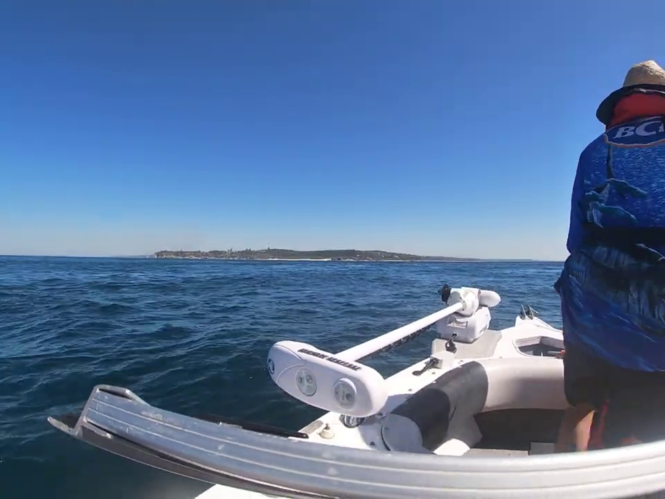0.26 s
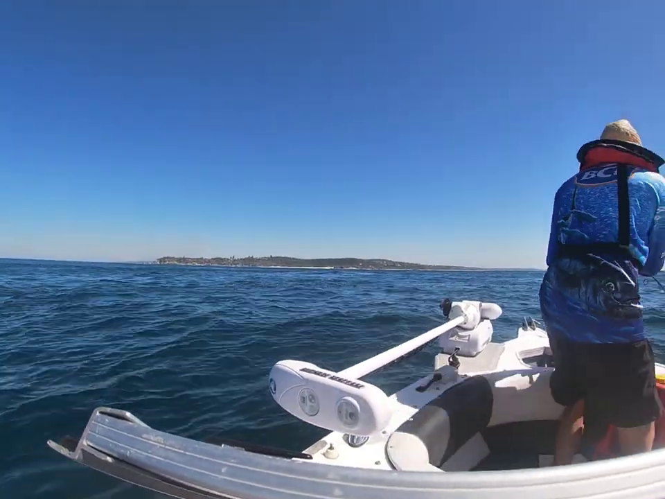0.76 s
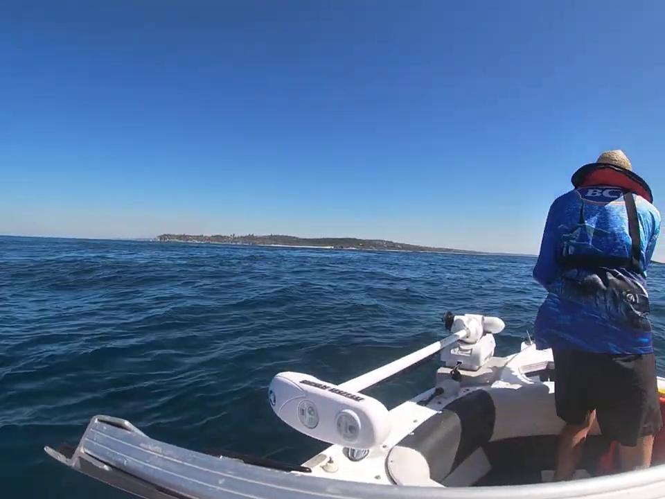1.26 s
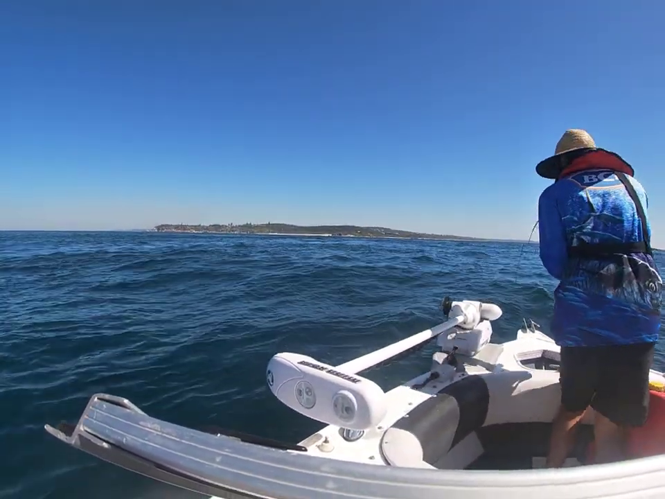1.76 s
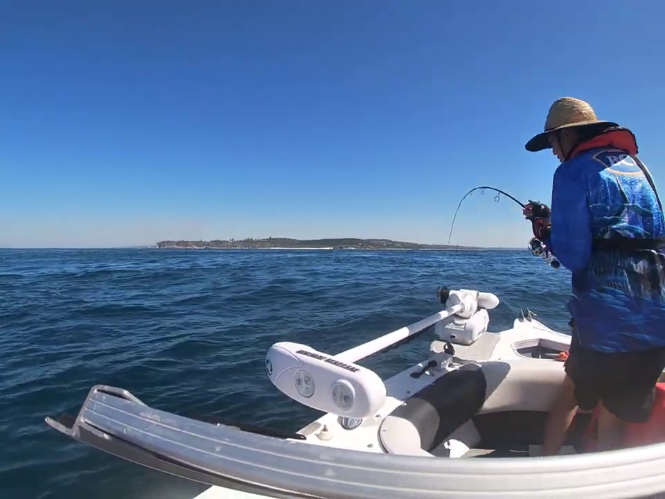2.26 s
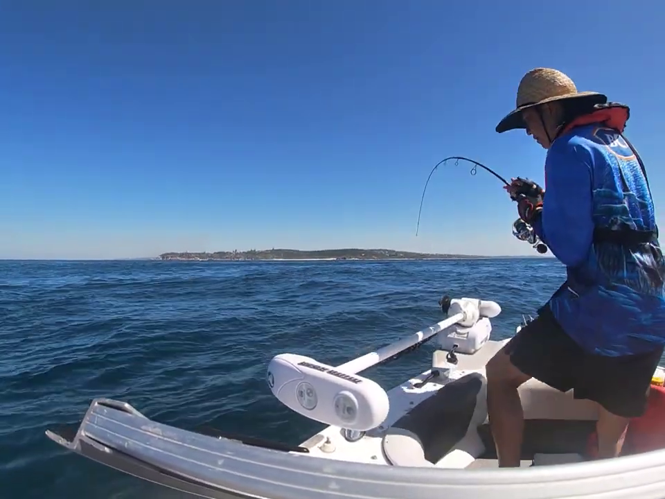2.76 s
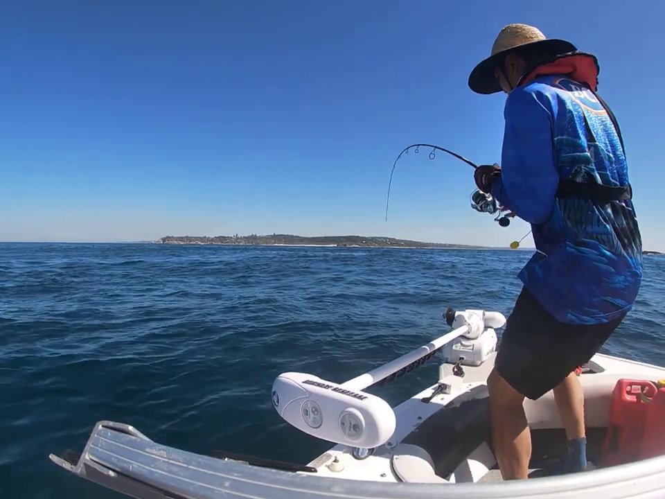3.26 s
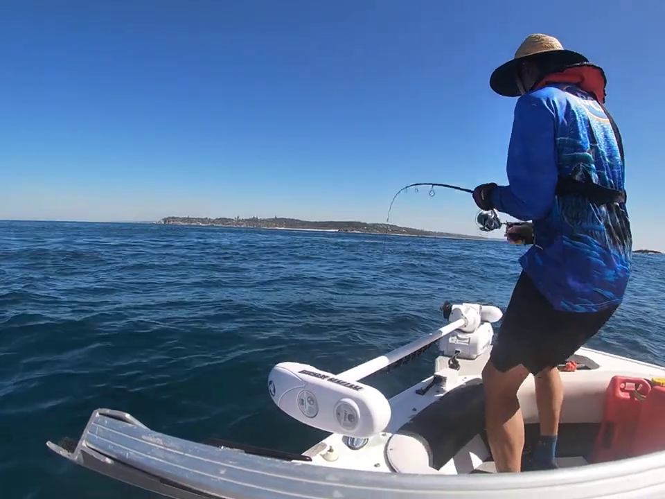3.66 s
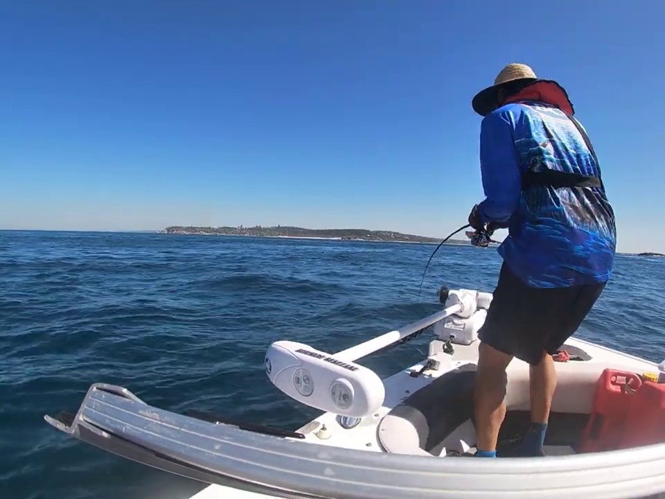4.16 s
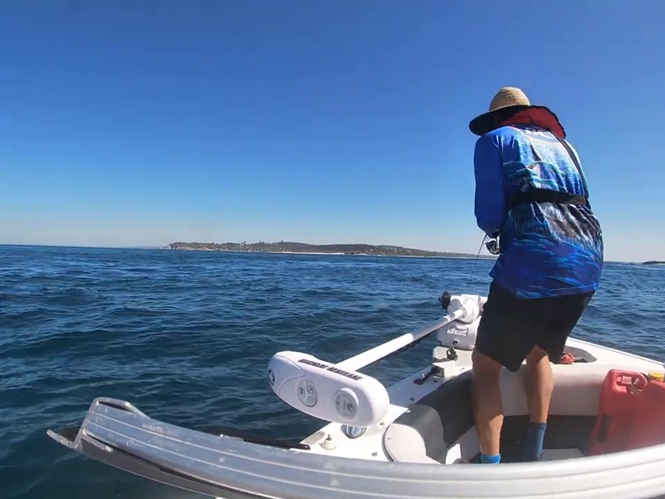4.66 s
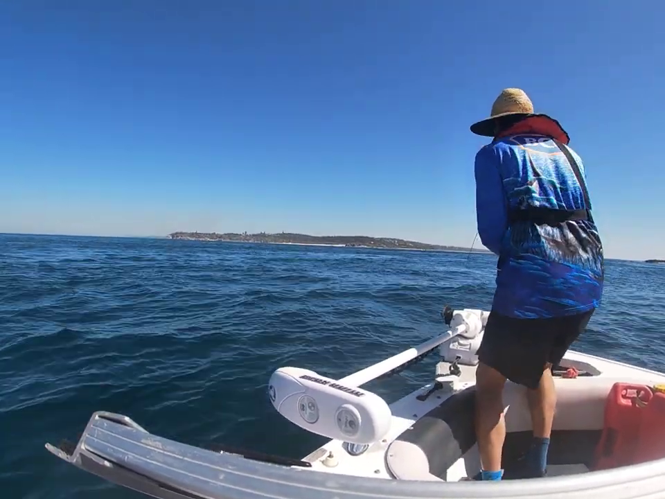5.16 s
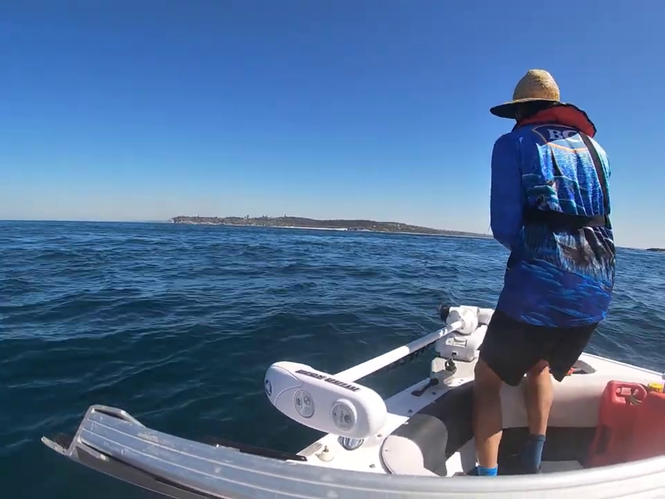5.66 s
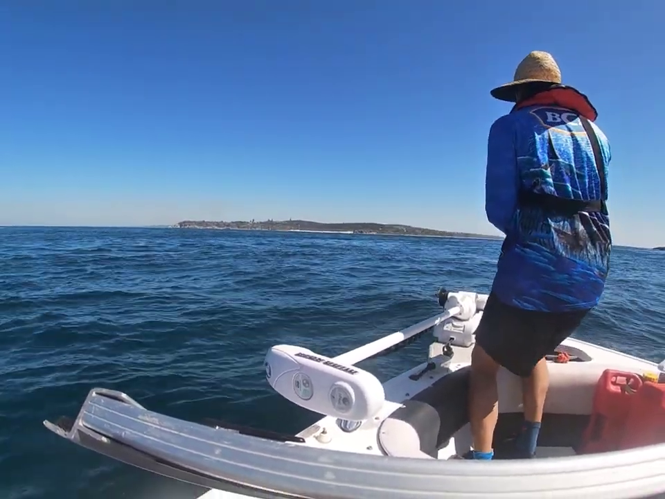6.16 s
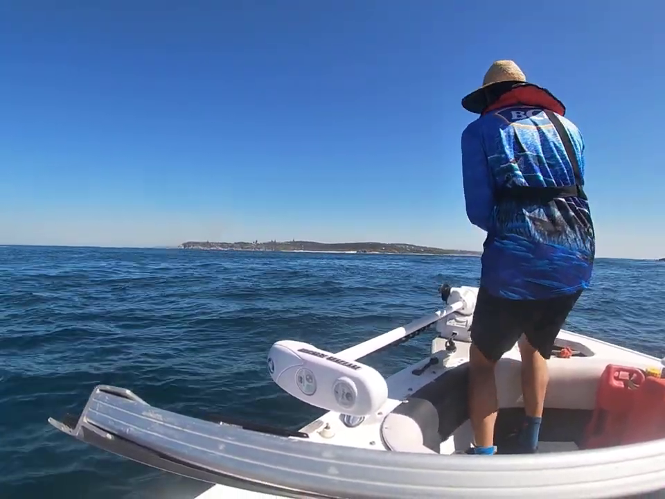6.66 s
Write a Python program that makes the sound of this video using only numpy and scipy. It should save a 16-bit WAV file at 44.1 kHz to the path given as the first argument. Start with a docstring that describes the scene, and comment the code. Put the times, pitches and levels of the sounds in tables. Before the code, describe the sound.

The microphone sits on a small boat in open air. From 0 to 0.6 s, hard low hull thumps come with hollow slaps, bubbly spray and a small click. It eases until 1.8 s, with quieter plops, gurgling and wind rumble. Between 1.8 and 3.9 s the hull booms more often, waves smack the side at about 2.3, 2.9 and 3.45 s, and tackle clicks with brief metal rings, notably near 3.1 s. At 4.0 s a few ticks start the reel; the drag quickly becomes a bright metallic buzz, peaking near 4.25 s, slowing around 4.6, then surging fast from 5.1 to 5.65 s, duller in treble. It falters, breaks into single ticks around 6.0 s, and buzzes again, slower, from 6.15 to 6.5 s. Slaps and wash continue beneath; gusts thud on the microphone, densest after 5 s, over faint steady hiss.

```python
"""A small boat rocks on a light sea: its hull thumps and low rings boom (sliding sines) as waves slap the side.
Slaps, spray and the wash along the hull are shaped noise mixed with showers of ringing bubbles.
From four seconds on a hooked fish pulls line in surges and the drag of the fishing reel buzzes:
a train of pin ticks rings the reel's resonances. Tackle clicks, wind buffets the microphone
with lumpy low noise, and a faint, steady hiss with a sharp upper edge lies behind."""
import sys
import numpy as np
from scipy import signal
from scipy.io import wavfile
from scipy.ndimage import map_coordinates

SR = 44100
rng = np.random.default_rng(int(sys.argv[2]) if len(sys.argv) > 2 else 0)


def wav_record(signal):
    """Record a signal, one row per channel, as 16-bit PCM in the file named by sys.argv[1]."""
    frames = np.transpose(np.atleast_2d(signal))
    bounded = np.clip(frames, -1, 1)
    # unit amplitude maps onto the largest positive 16-bit level
    quanta = np.round(bounded * 32767).astype(np.int16)
    wavfile.write(sys.argv[1], SR, quanta)


N = 304731
TIME = np.arange(N) / SR
CREEP_PER_S = 52   # at or below this click rate the drag's steady run stops


def knocks():
    """Falling thumps of the hull, low booming rings from water and wind, and small plops beside the boat."""
    # the hull drops onto a wave: (t/s, relative peak/dB, pitch/Hz, t60/s)
    hull_thumps = [(0.253, -9, 84, 0.23), (0.518, -12, 117, 0.097), (1.892, -19.5, 85.6, 0.61),
                   (2.142, -19.5, 51, 0.11), (2.897, -10.5, 70, 0.045), (3.33, -19.5, 67.4, 0.15),
                   (3.552, -9, 115.4, 0.017), (4.235, -18.5, 112.8, 0.51), (4.779, -22.5, 67.16, 0.19),
                   (5.232, -13, 106, 0.053), (6.074, -23, 68.1, 0.11)]
    # low booming rings, some from water under the hull, later ones from wind buffets:
    # (t/s, relative peak/dB, pitch/Hz, t60/s, glide/octaves per s)
    low_rings = [(.141, -25, 310, 0.069, 4.5), (.167, -27, 308, 0.035, -7), (.187, -35, 315, 0.26, -5.5),
                 (.94, -33.5, 217, 0.26, -1), (.978, -32, 263, 0.14, 4.5), (1.04, -44, 307, 0.08, 0),
                 (1.773, -23.5, 175, 0.062, -6.5), (1.815, -31, 171, 0.074, 0),
                 (1.845, -17, 174, 0.052, 0.5), (2.381, -25.5, 144.6, 0.12, 6.5),
                 (2.421, -22.5, 159.8, 0.32, 0.5), (2.512, -27.5, 155, 0.43, 0),
                 (2.686, -21.5, 154.8, 0.32, 0.5), (2.872, -13.5, 139.7, 0.13, 6),
                 (2.913, -20.5, 213, 0.16, -1.5), (3.046, -22, 204, 0.14, 4.5), (3.07, -20, 200, 0.095, -1),
                 (3.12, -36, 432, 0.27, -1.5), (3.433, -23.5, 146, 0.35, 2.5), (3.437, -17, 311, 0.031, -4),
                 (3.462, -23.5, 230.7, .2, -0.5), (3.545, -21.5, 154.4, 0.14, 0),
                 (4.056, -26, 192.5, 0.23, 0.5), (4.224, -13.5, 161.4, 0.23, 5), (4.245, -31, 290, 0.1, 4),
                 (4.302, -20, 169, .09, 1), (4.389, -28.5, 169, .08, 0), (4.463, -24.5, 159.1, 0.044, 14),
                 (4.58, -30, 165, 0.24, 1.5), (5.074, -28.5, 150, 0.087, -2), (5.18, -19.5, 181, 0.05, -1),
                 (5.188, -26.5, 307.7, 0.079, 1.5), (5.388, -27.5, 177, 0.085, -5.5),
                 (5.627, -31, 409.7, 0.12, -9.5), (5.648, -26.5, 371, 0.13, 0.5),
                 (5.755, -32, 193.2, 0.45, 0.5), (5.838, -21, 162, 0.07, -2.5),
                 (5.976, -28.5, 170, .08, -2.5), (6.186, -28.5, 147, 0.046, 11),
                 (6.228, -28, 270.4, 0.047, -1), (6.413, -29.5, 291.5, 0.09, -2.5),
                 (6.602, -29.5, 171.7, 0.33, 0), (6.643, -32, 297, 0.12, 0)]
    # single bubbles pinched off beside the boat:
    # (t/s, relative peak/dB, pitch/Hz, t60/cycles, glide/octaves per s)
    small_plops = [(.068,-32,1360,26,0), (.069,-35,1680,30,0), (.079,-26,555,19.1,-2), (.087,-29,947,46,1),
                   (.115,-38.5,3110,260,-1), (.122,-44,1530,550,-1), (.178,-41,1610,120,4),
                   (.207,-35.5,1290,420,3), (.251,-28,1060,30,0), (.26,-23,411,49,0.5),
                   (.281,-37.5,1454,190,3.5), (.324,-34.5,568,78,0), (.518,-29.5,414,59,2),
                   (.776,-44,710,25,0), (.87,-35,1045,24,0), (.871,-32,588,30,1), (.888,-42,2040,89,2),
                   (.902,-35,896,130,1.5), (.922,-42,4170,240,1), (1.003,-27,348.5,61,0),
                   (1.013,-43,2750,260,2), (1.02,-36,723,50,2), (1.095,-39,1120,70,2),
                   (1.16,-47,2070,190,-1), (1.165,-41,980,60,4), (1.48,-35,550,33,-1), (1.549,-32,863,58,0),
                   (1.603,-37,430,28,2), (1.669,-33,440,28,4), (1.902,-37,1100,65,1), (1.917,-26,520,48,1),
                   (2.19,-25,757,26,0), (2.228,-31,600,26,2), (2.25,-26,530,22,0), (2.323,-23.5,1520,52,1),
                   (2.329,-24,568,99,0), (2.356,-30,743,45,0), (2.407,-22.5,436,105,0),
                   (2.432,-30,2350,130,0), (2.434,-33,2950,90,0), (2.49,-37,1610,130,2),
                   (2.522,-29,453,30,0), (2.703,-38,1160,88,2.5), (2.872,-22.5,713,21,-2),
                   (2.871,-25,470,17,0), (2.99,-30,900,32,0), (2.991,-32,660,30,0), (3.012,-29.5,604,58,1),
                   (3.072,-31.5,1390,77,2), (3.405,-35.5,1515,100,0), (3.44,-31,474,24,0),
                   (3.441,-28,733,34,1), (3.74,-27,472,18,-1), (3.835,-40,1003,180,1),
                   (3.865,-38,1716,310,1.5), (4.045,-30.5,568,40,1), (4.046,-34,806,50,0),
                   (4.324,-26,402,37,0), (4.371,-36,1300,125,0), (4.49,-35,1214,125,1),
                   (5.222,-32,400,26,2), (5.489,-31,1750,42,0), (5.492,-29,2000,44,-2),
                   (5.497,-23,1076,45,0), (5.999,-38,624,14,3), (6.543,-42.5,1920,130,2),
                   (6.65,-35,430,28,1)]
    thump_glide = -6.5   # octaves per s
    thumps = [(*row, thump_glide) for row in hull_thumps]
    plops = [(s, db, hz, cycles / hz, glide) for s, db, hz, cycles, glide in small_plops]
    thump = booms(thumps, swell_cycles=0.91, rough=0.24, shake_rate=70)
    low_boom = booms(low_rings, swell_cycles=1.78, rough=0.12, shake_rate=200)
    plop = booms(plops, swell_cycles=1.1, rough=0.5, shake_rate=57)
    return from_db(-0.5) * thump + from_db(3.0) * low_boom + from_db(-4.0) * plop


def booms(table, swell_cycles, rough, shake_rate, waver_octaves=0.044):
    """Each sine ring swells over about a cycle or two, slides and wavers in pitch, and dies away."""
    out = np.zeros(N)
    waver = waver_octaves * drift(38)
    for s, db, hz, t60, glide in table:
        span, t = event_span(s)
        pitch = hz * 2 ** (glide * t + waver[span])
        ring = np.sin(2 * np.pi * np.cumsum(pitch) / SR)
        out[span] += from_db(db) * swell_and_fade(t, swell_cycles / hz, t60) * ring
    # the level of the rings shakes at random
    return out * (1 + rough * drift(shake_rate))


def slaps(spray_cut_hz=7500):
    """A hollow smack on the side with a burst of bubbly spray; both swell and die quickly."""
    # waves slap the side: (t/s, relative body level/dB, relative spray level/dB, swell/s, t60/s)
    hits = [(0.07, -28, -48, 0.0019, 0.32), (.114, -38, -55.5, .002, 0.16),
            (0.249, -24.5, -47, 0.0023, 0.24), (0.516, -29, -54, 0.0036, 0.068),
            (0.866, -39, -53.5, 0.0025, 0.43), (0.915, -38.5, -60, 0.0032, 0.17),
            (1.07, -48, -58, 0.028, 0.12), (1.547, -36, -75, 0.0013, 0.18),
            (1.815, -31, -50.5, 0.033, 0.23), (2.245, -31, -56, 0.0014, 0.061),
            (2.323, -27.5, -49, 0.0022, 0.15), (2.355, -34, -53.5, .002, 0.073),
            (2.399, -32.5, -50, 0.004, 0.27), (2.431, -38, -49.5, 0.004, 0.24),
            (2.479, -34, -49.5, 0.0092, 0.19), (2.666, -43, -49.5, 0.016, 0.091),
            (2.871, -30, -57, 0.0017, 0.19), (2.991, -30.5, -59, 0.0015, 0.2),
            (3.02, -55, -53.5, 0.027, 0.4), (3.075, -57, -59, 0.0044, 0.65), (3.115, -51, -57, .01, 0.23),
            (3.228, -57, -60.5, .004, .12), (3.325, -40.5, -61.5, .01, 0.22), (3.385, -35, -54, .03, 0.21),
            (3.437, -25, -45, 0.0028, 0.089), (3.449, -34, -46.5, 0.002, 0.041),
            (3.785, -41, -57, 0.031, 0.58), (3.87, -45, -58.5, .005, .12),
            (4.044, -30.5, -54, 0.0021, 0.44), (4.194, -26.5, -72, 0.013, 0.28),
            (4.602, -26, -46.5, 0.002, 0.13), (4.874, -30.5, -50.5, 0.002, 0.1),
            (5.184, -52, -62, 0.0024, 0.055), (5.483, -37, -60, 0.0051, 0.82),
            (6.73, -34.5, -57.5, 0.00095, 0.084)]
    # colour of the hollow smack: (f/Hz, relative level/dB per Hz)
    body_colour = [(100, -20), (200, 4), (330, 1.5), (560, -4.5), (900, -11.5), (1500, -25.5),
                   (3000, -51.5)]
    # colour of the spray ahead of its low-pass: (f/Hz, relative level/dB per Hz)
    spray_colour = [(700, 0), (1400, 10.5), (2900, 5.5), (4200, -3.5), (5600, -8.5), (8000, -51),
                    (13000, -49)]
    body, spray = np.zeros((2, N))
    for s, body_db, spray_db, swell, t60 in hits:
        span, t = event_span(s)
        burst = swell_and_fade(t, swell, t60)
        body[span] += from_db(body_db) * burst
        spray[span] += from_db(spray_db) * burst
    churn = from_db(-4.5) * turbulence(body_colour, patchy_db=5.0, flutter_rate=16)
    churn = churn + from_db(-4.0) * bubbles(body_colour, per_s=1400, spread_db=2.0, sharpness=44)
    droplets = turbulence(spray_colour, patchy_db=1.0, flutter_rate=35)
    droplets = droplets + from_db(2.0) * bubbles(spray_colour, per_s=1800, spread_db=2.0, sharpness=18)
    droplets = signal.sosfilt(signal.butter(2, spray_cut_hz, fs=SR, output="sos"), droplets)
    return body * churn + spray * droplets


def wash():
    """Large bubbles gurgle along the hull while small ones fizz and hiss in the foam."""
    # water along the hull: (t/s, relative gurgle, fizz and hiss levels/dB)
    levels = [(0.0, -45, -47, -62.5), (0.17, -41, -47.5, -61), (0.46, -53.5, -57, -76),
              (0.81, -49.5, -60, -78.5), (1.02, -40.5, -54.5, -72), (1.35, -44, -53, -74),
              (1.71, -43.5, -48.5, -63.5), (2.17, -42, -51.5, -65.5), (2.39, -34, -45, -62),
              (2.71, -45.5, -54.5, -67.5), (3.31, -46, -53.5, -66.5), (3.46, -36, -63.5, -74.5),
              (3.73, -72, -53, -71), (4.08, -35, -55.5, -67), (4.25, -42, -43, -53.5),
              (4.66, -39, -53, -69), (4.89, -47.5, -53.5, -67), (5.41, -47, -57.5, -67),
              (5.81, -43.5, -60, -74), (6.08, -49.5, -56, -72.5), (6.39, -43, -56.5, -69.5),
              (6.91, -43.5, -54.5, -72)]
    # colours of the large, small and tiny bubbles, each: (f/Hz, relative level/dB per Hz)
    gurgle_colour = [(110, -8), (170, 10.5), (300, -1.5), (550, -1), (900, -23.5), (1500, -21)]
    fizz_colour = [(650, 8.5), (1000, 5.5), (1500, 2), (2000, -4), (2700, -21.5)]
    hiss_colour = [(2000, -4.5), (2900, 4.5), (4200, -8.5), (5600, -6), (7000, -25.5), (10000, -27),
                   (14000, -39)]
    gurgle_db, fizz_db, hiss_db = in_time(levels)
    large = bubbles(gurgle_colour, per_s=500, spread_db=2.0, sharpness=27)
    small = bubbles(fizz_colour, per_s=700, spread_db=4.0, sharpness=43)
    tiny = bubbles(hiss_colour, per_s=1800, spread_db=2.0, sharpness=32)
    swirl = turbulence(gurgle_colour, patchy_db=3.5, flutter_rate=21)
    foam = turbulence(fizz_colour, patchy_db=5.0, flutter_rate=43)
    spume = turbulence(hiss_colour, patchy_db=2.5, flutter_rate=14)
    gurgle = from_db(-5.0) * large + from_db(-1.5) * swirl
    fizz = from_db(-3.5) * small + from_db(-7.0) * foam
    hiss = from_db(1.0) * tiny + from_db(-5.0) * spume
    return from_db(gurgle_db) * gurgle + from_db(fizz_db) * fizz + from_db(hiss_db) * hiss


def reel(fast_run=400):
    """A sprung pin ticks over the teeth of the turning spool, scraping after each tick; the reel rings."""
    # line pulled off in surges:
    # (t/s, drag click rate/per s, level of the clicking at this moment, added to the speed law/dB)
    drag_speed = [(4.095,51.6,3.5), (4.11,205,2), (4.165,307,5), (4.24,433,3.5), (4.35,340,1.5),
                  (4.46,200,2.5), (4.52,145,2), (4.58,180,1), (4.63,62.5,-1.5), (4.69,125,1),
                  (4.76,190,1.5), (4.84,126,0.5), (4.91,270,2.5), (4.98,154,5), (5.05,246,-1),
                  (5.1,404,2.5), (5.42,374,0.5), (5.6,312,2.5), (5.675,250,2.5), (5.695,118,2),
                  (5.725,150,2), (5.755,64,-1), (5.81,87,2.5), (5.85,243,1.5), (5.915,212,-2.5),
                  (5.94,85,0), (5.965,71,0.5), (5.99,40,4.5), (6.145,39.6,5.5), (6.18,165,1.5),
                  (6.25,186,-3.5), (6.29,146,0.5), (6.33,107,1.5), (6.42,77,-1), (6.47,66,-4.5),
                  (6.495,43,5)]
    # the spool's ring: (f/Hz, width/Hz, relative level/dB)
    spool_modes = [(2184, 220, 7), (4690, 220, -5), (5930, 150, -2), (6810, 120, 9), (7050, 200, 2.5),
                   (9190, 400, -12), (10300, 1200, -22), (12000, 1600, -25), (13900, 800, -28)]
    # further reel resonances, somewhat stronger as the clicks get faster: (f/Hz, width/Hz, relative level/dB)
    further_modes = [(1560, 480, -2), (2330, 520, -5), (3220, 150, -11.5), (3900, 84, 4), (4200, 420, -6.5),
                     (4840, 73, 3.5), (5560, 370, -0.5), (9300, 3000, -11)]
    # the ticks bounce off the deck and the side: (delay/s, level/dB)
    deck_echoes = [(.0037, -11), (.0061, -15)]
    drag_level_db, db_per_doubling = -50, 3.5   # speed law: level on a fast run; louder with speed
    turn_s, turn_takes_s = 5, 1
    screened_db, screened_hz = 5.5, 7050        # treble lost at this pitch
    rattle_db, rattle_hz = 6.0, 2200            # flutter of rattle_db at this pitch, deeper at lower pitches
    scrape, scrape_s = 0.09, 0.003              # strength and decay time
    wobble_s, drifting_db, further_cut_hz = 0.00008, 2.3, 9500

    per_s, moment_db = in_time(drag_speed)
    speed = per_s / fast_run
    pulling = per_s > CREEP_PER_S
    drag_db = drag_level_db + moment_db + db_per_doubling * np.log2(speed)
    ticks = pin_ticks(per_s)
    contact = signal.lfilter([1], [1, -np.exp(-1 / (scrape_s * SR))], ticks + 1e-18)
    force = ticks + scrape * contact * rng.standard_normal(N)
    # the spool rattles on its shaft, which makes the low modes flutter
    flutter_db = rattle_db * np.tanh(drift(45))
    # the angler turns and his body screens the spool's treble, more with rising pitch
    in_view = np.clip((turn_s - TIME) / turn_takes_s + 0.5, 0, 1)

    def ring_modes(modes, open_db):
        """Sum the modes, each mode's level drifting slowly at random."""
        out = 0
        for k, (hz, width, db) in enumerate(modes):
            mode_db = db + open_db * hz / screened_hz
            mode_db = mode_db + drifting_db * drift(5.5) + flutter_db * rattle_hz / hz
            out = out + (-1) ** k * from_db(mode_db) * resonate(force, hz, width)
        return out

    spool = ring_modes(spool_modes, screened_db * in_view)
    further = ring_modes(further_modes, 0)
    further = signal.sosfilt(signal.butter(2, further_cut_hz, fs=SR, output="sos"), further)
    ring = spool + further * speed ** 0.47
    echoes = sum(from_db(db) * np.roll(ring, round(delay * SR)) for delay, db in deck_echoes)
    # unit power on average over the time the line is pulled
    ring = rms_one(ring + echoes) * np.sqrt(pulling.mean())
    # the ring wavers in pitch
    ring = map_coordinates(ring, [(TIME + wobble_s * drift(4.5)) * SR], order=3)
    return from_db(drag_db) * ring + speed ** 2 * pulling * whine(per_s)


def pin_ticks(per_s, jitter=0.025, tooth_db=3.0, uneven_db=1.5, creep_db=-16, count=12):
    """Strong and weak teeth return on every turn; a creeping spool gives single ticks."""
    # between surges the spool creeps on by single teeth: (t/s, level relative to creep_db/dB)
    creep_ticks = [(4.029,-4), (4.048,0.5), (4.082,1.5), (5.782,-2), (6.002,-14), (6.028,-5), (6.058,-4),
                   (6.1,-5), (6.121,-3.5), (6.143,-7), (6.496,-8), (6.566,-3)]
    rate = (per_s > CREEP_PER_S) * per_s * (1 + jitter * drift(60))
    teeth = np.ceil(np.cumsum(rate) / SR).astype(int)
    pattern = rms_one(from_db(tooth_db * rng.standard_normal(count)))
    uneven = from_db(uneven_db * rng.standard_normal(N))
    # the square root evens out the power of slow and fast trains
    ticks = np.diff(teeth, prepend=0) * pattern[teeth % count] * uneven / np.sqrt(per_s)
    for s, db in creep_ticks:
        ticks[round(s * SR)] += from_db(creep_db + db)
    return ticks


def whine(per_s, width_hz=110):
    """The spinning spool sings: narrow, rough tones whose pitch follows its speed."""
    # tones on a fast run: (multiple of the click rate, relative level/dB)
    tones = [(3.85, -55.5), (6.2, -59.5), (10, -64)]
    phase = 2 * np.pi * np.cumsum(per_s) / SR
    out = 0
    for k, db in tones:
        tone = drift(width_hz) * np.sin(k * phase) + drift(width_hz) * np.cos(k * phase)
        out = out + from_db(db) * tone
    return out


def tackle():
    """Hard little contacts: a crisp click of noise and a brief metal ring of decaying sines."""
    # tackle is knocked and clicks: (t/s, click level/dB, ring level/dB)
    contacts = [(0.253, -47, -65), (0.52, -56.5, -72), (.873, -50, -65), (1.073, -55, -65),
                (2.324, -59, -70), (2.438, -54, -65), (2.477, -55, -52), (2.69, -43, -62),
                (3.083, -42, -49), (3.454, -43, -61), (3.694, -59, -71), (4.612, -48, -62)]
    # colour of the click: (f/Hz, relative level/dB per Hz)
    click_colour = [(2500, 5), (4200, 10), (6000, 1), (7500, -5), (10000, -19), (14000, -24)]
    # its metal rings: (f/Hz, relative level/dB, t60/s)
    metal_modes = [(3050, -4, 0.29), (3822, -9.5, .25), (4635, -5, 0.07), (5911, -2, 0.07),
                   (5652, -2, 0.057)]
    click, ring = np.zeros((2, N))
    strengths = from_db(2.0 * rng.standard_normal((len(contacts), len(metal_modes))))
    for (s, click_db, ring_db), mode_strengths in zip(contacts, strengths):
        span, t = event_span(s)
        click[span] += from_db(click_db) * swell_and_fade(t, swell=0.0015, t60=0.027)
        for (hz, db, t60), strength in zip(metal_modes, mode_strengths):
            decay = from_db(ring_db + db - 60 * t / t60)
            ring[span] += strength * decay * np.sin(2 * np.pi * hz * t)
    return click * turbulence(click_colour, patchy_db=7.0, flutter_rate=16) + ring


def wind(level_db=5.5, lumpy_db=3.0, strong_gust_db=-37, eddy_growth=2.08):
    """Air hits the microphone port in lumps; strong gusts add smaller, higher eddies."""
    # gusts on the microphone: (t/s, relative rumble level/dB)
    gusts = [(0, -46), (.32, -39.5), (.7, -42.5), (.85, -50.5), (1.27, -59), (1.4, -41.5), (1.68, -44),
             (1.97, -33.5), (2.15, -48), (2.45, -51.5), (2.8, -59.5), (3.02, -35), (3.28, -53), (3.45, -32),
             (3.75, -38), (4.15, -39.5), (4.55, -34.5), (5.03, -44), (5.2, -40.5), (5.7, -51.5),
             (5.86, -37), (6.3, -35), (6.62, -41.5), (6.91, -47)]
    # colours of the rumble and of the eddies, each: (f/Hz, relative level/dB per Hz)
    rumble_colour = [(20, 3.5), (45, -2), (72, -3), (110, -9), (180, -31)]
    eddy_colour = [(80, 8.5), (120, 11), (190, 0), (300, -3.5), (450, -15), (700, -40.5)]
    gust_db, = in_time(gusts)
    rumble_db = gust_db + level_db + lumpy_db * drift(3.6)
    rumble = from_db(rumble_db) * turbulence(rumble_colour, patchy_db=3.5, flutter_rate=26)
    lumps_db = 3.2 * np.minimum(drift(35), 1.8)
    # eddies grow about twice as fast in dB as the gust
    eddy_db = strong_gust_db + eddy_growth * (gust_db - strong_gust_db) + lumps_db
    return rumble + from_db(eddy_db) * turbulence(eddy_colour, patchy_db=0.5, flutter_rate=30)


def buffets(level_db=3.0, swell_s=0.0039):
    """A lump of air breaks over the port with a short, rough thud."""
    # single buffets of air on the port: (t/s, relative level/dB, t60/s)
    lumps = [(1.872, -30.5, 0.39), (3.384, -27.5, 0.28), (3.472, -26, 0.088), (3.503, -32, 0.32),
             (3.598, -30.5, 0.11), (3.736, -30, 0.11), (3.873, -29, 0.059), (3.945, -31.5, 0.15),
             (4.331, -26.5, 0.3), (4.51, -32.5, 0.52), (4.66, -36, 0.15), (4.876, -32, 0.12),
             (5.094, -23, 0.057), (5.116, -27, 0.1), (5.183, -22, 0.19), (5.806, -30, 0.35),
             (5.85, -30, 0.042), (5.908, -23.5, 0.087), (5.995, -27, 0.055), (6.084, -34, 0.36),
             (6.197, -29, 0.078), (6.254, -29.5, 0.12), (6.418, -30, 0.098)]
    # colour of the thud: (f/Hz, relative level/dB per Hz)
    thud_colour = [(90, 2), (150, 12), (280, -1), (420, -24.5), (650, -37.5)]
    force = 0
    for s, db, t60 in lumps:
        force = force + from_db(db) * swell_and_fade(np.maximum(TIME - s, 0), swell_s, t60)
    return from_db(level_db) * force * turbulence(thud_colour, patchy_db=1.0, flutter_rate=42)


def background_hiss(level_db=-81, low_hz=2000, high_hz=6120):
    """A faint, steady hiss: noise with a gentle lower slope and a sharp upper edge."""
    hiss = rng.standard_normal(N)
    hiss = signal.sosfilt(signal.butter(1, low_hz, "high", fs=SR, output="sos"), hiss)
    hiss = signal.sosfilt(signal.butter(12, high_hz, fs=SR, output="sos"), hiss)
    return from_db(level_db) * rms_one(hiss)


def turbulence(spectrum, patchy_db, flutter_rate):
    """Half-octave bands of noise, each swelling and sinking by itself; rms 1."""
    out, white = 0, rng.standard_normal((2, N))
    lowest, highest = spectrum[0][0] / 2 ** 0.5, spectrum[-1][0] * 2 ** 0.5
    for k, hz in enumerate(20 * 2 ** np.arange(0, 9.6, 0.5)):
        if lowest < hz < highest:
            edges = [hz / 2 ** 0.25, hz * 2 ** 0.25]
            # neighbouring bands take different noises
            band = signal.sosfilt(signal.butter(2, edges, "band", fs=SR, output="sos"), white[k % 2])
            out = out + band * from_db(at_hz(spectrum, hz) + patchy_db * drift(flutter_rate))
    return rms_one(out)


def bubbles(spectrum, per_s, spread_db, sharpness, count=26):
    """Bubbles of random strength, each ringing briefly at one of a set of pitches; rms 1."""
    strengths = from_db(spread_db * np.minimum(rng.exponential(1, N), 4)) * rng.choice([-1, 1], N)
    births = strengths * (rng.random(N) < per_s / SR)
    dealt = rng.integers(0, count, N)   # which pitch each bubble gets
    out = 0
    for k, hz in enumerate(np.geomspace(spectrum[0][0], spectrum[-1][0], count)):
        ring = resonate(births * (dealt == k), hz, hz / sharpness)
        # a second, broad resonance trims the skirts
        out = out + from_db(at_hz(spectrum, hz)) * resonate(ring, hz, hz)
    return rms_one(out)


def resonate(x, hz, width_hz):
    """A two-pole resonance with gain 1 on top."""
    r = np.exp(-np.pi * width_hz / SR)
    feedforward = np.array([1, 0, -1]) * (1 - r * r) / 2
    feedback = [1, -2 * r * np.cos(2 * np.pi * hz / SR), r * r]
    return signal.lfilter(feedforward, feedback, x + 1e-18)


def swell_and_fade(t, swell, t60):
    """A smooth rise to 1, then an exponential decay."""
    rise = np.sin(np.pi / 2 * np.minimum(t / swell, 1)) ** 2
    return rise * from_db(-60 * np.maximum(t - swell, 0) / t60)


def event_span(s):
    """The samples of an event from its start for up to half a second, and the time within it."""
    start = round(s * SR)
    t = TIME[:min(N - start, SR // 2)]
    return slice(start, start + len(t)), t


def drift(rate):
    """Smooth chance with spread 1: noise through two equal low-pass poles at rate in Hz."""
    step = 40   # samples between the drawn points
    r = np.exp(-2 * np.pi * rate * step / SR)
    noise = rng.standard_normal(N // step + 2002)
    slow = signal.lfilter([1], [1, -2 * r, r * r], noise)[2000:]   # skip the settling
    return np.interp(np.arange(N) / step, np.arange(len(slow)), rms_one(slow))


def in_time(rows):
    """Each column of a curve at every sample."""
    s, *columns = np.transpose(rows)
    return [np.interp(TIME, s, c) for c in columns]


def at_hz(points, hz):
    """Read a spectrum on a log-frequency axis."""
    f, db = np.transpose(points)
    return np.interp(np.log(hz), np.log(f), db)


def from_db(db):
    """Decibels to gain."""
    return np.exp(np.asarray(db) * (np.log(10) / 20))


def rms_one(x):
    """Scale to unit power."""
    return x / np.sqrt(np.mean(x ** 2) + 1e-20)


def scene():
    """Hull, water, reel, tackle, wind and a faint background hiss at one microphone."""
    boat = knocks() + slaps() + wash()
    gear = reel() + tackle()
    air = wind() + buffets()
    return (boat + gear + air + background_hiss())[None]


def record(dry, bass_cut_hz=18, top_cut_hz=14400):
    """The deepest bass and the top are cut."""
    dry = signal.sosfilt(signal.butter(2, bass_cut_hz, "high", fs=SR, output="sos"), dry)
    return signal.sosfilt(signal.ellip(10, 0.2, 70, top_cut_hz, fs=SR, output="sos"), dry)


dry = scene()
out = record(dry)
wav_record(out)
```